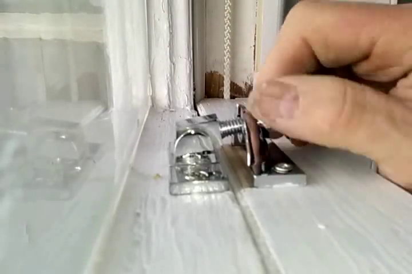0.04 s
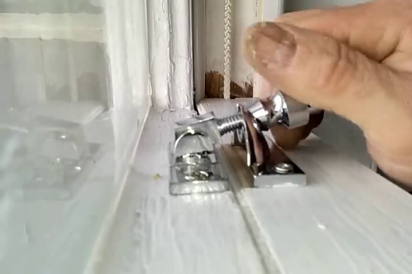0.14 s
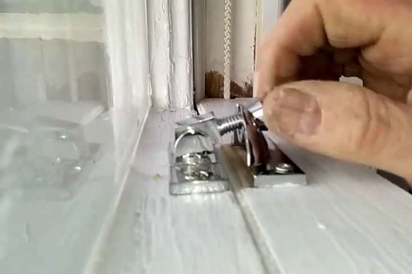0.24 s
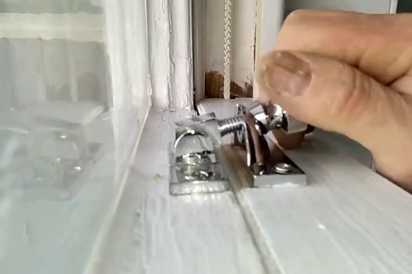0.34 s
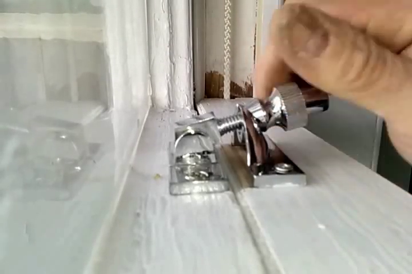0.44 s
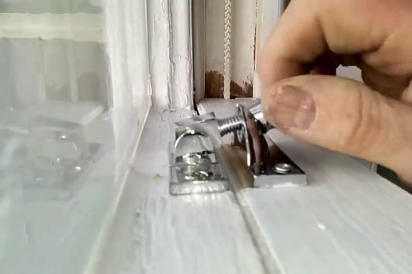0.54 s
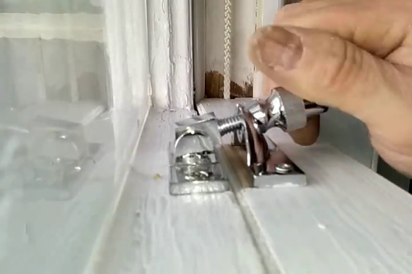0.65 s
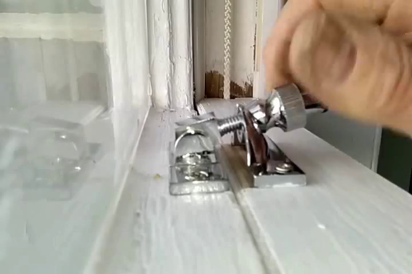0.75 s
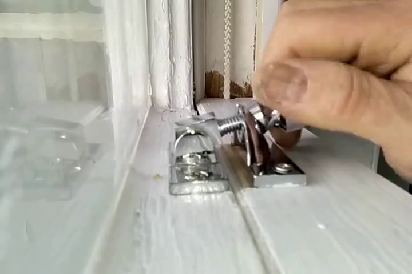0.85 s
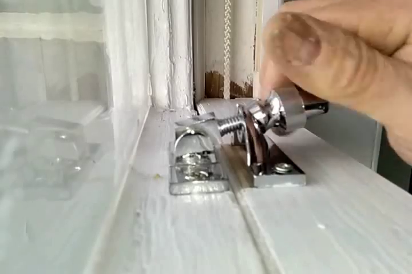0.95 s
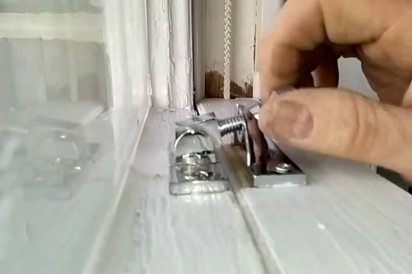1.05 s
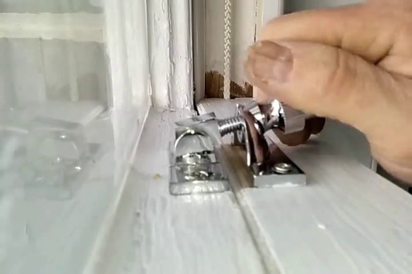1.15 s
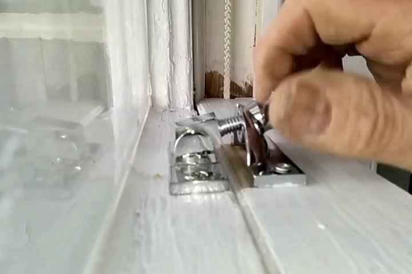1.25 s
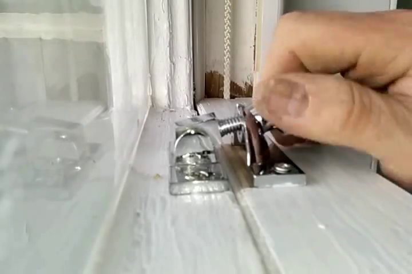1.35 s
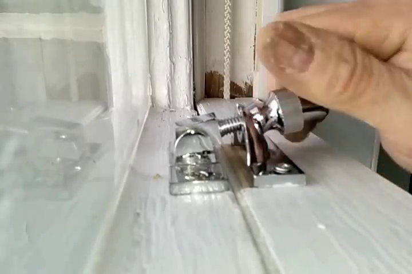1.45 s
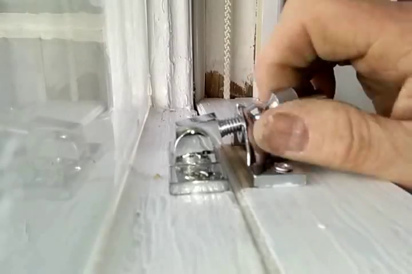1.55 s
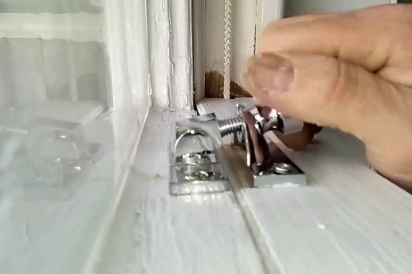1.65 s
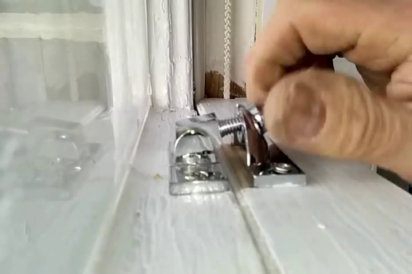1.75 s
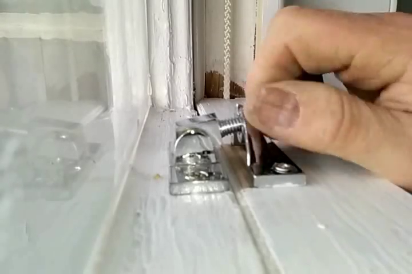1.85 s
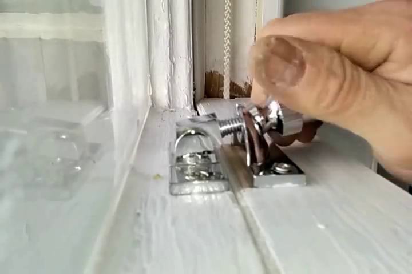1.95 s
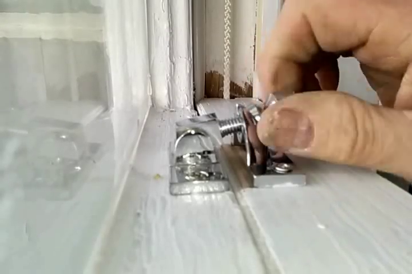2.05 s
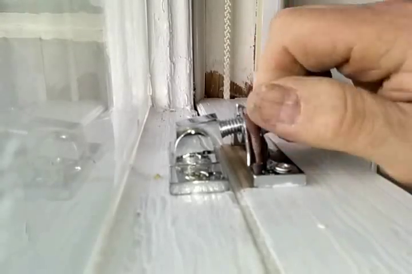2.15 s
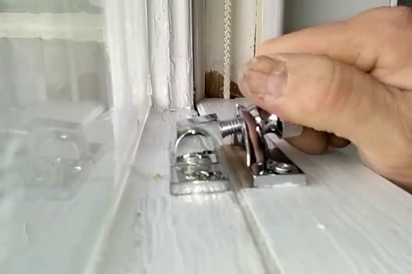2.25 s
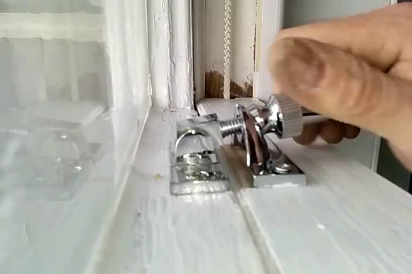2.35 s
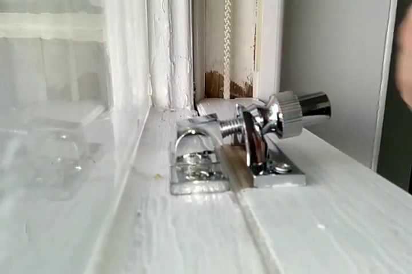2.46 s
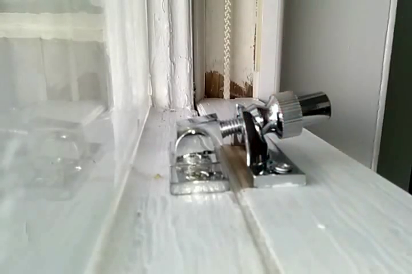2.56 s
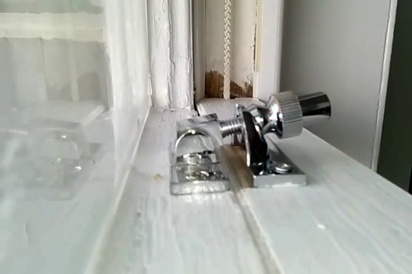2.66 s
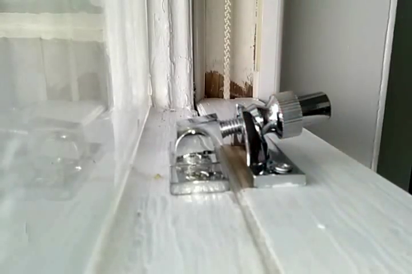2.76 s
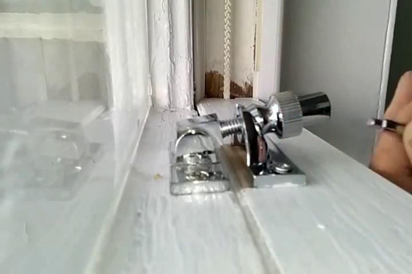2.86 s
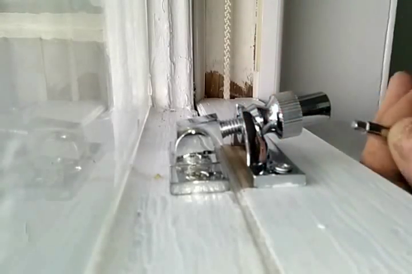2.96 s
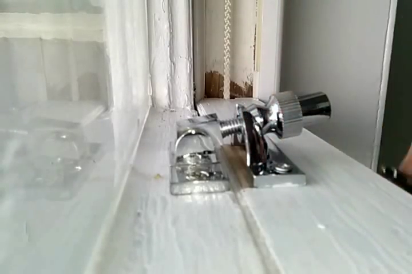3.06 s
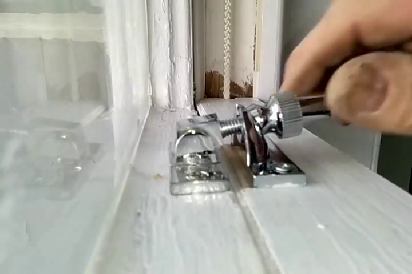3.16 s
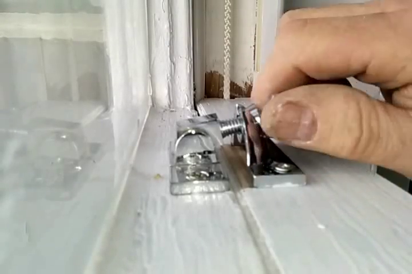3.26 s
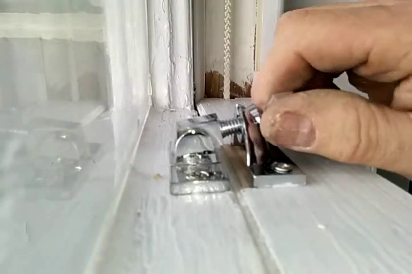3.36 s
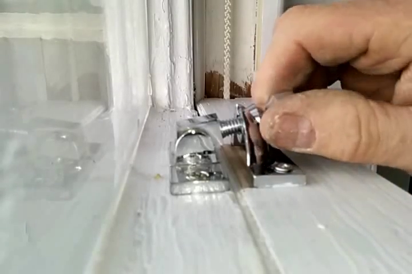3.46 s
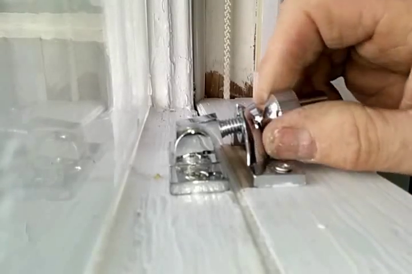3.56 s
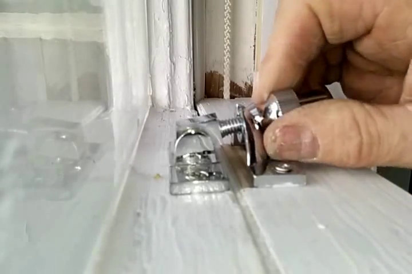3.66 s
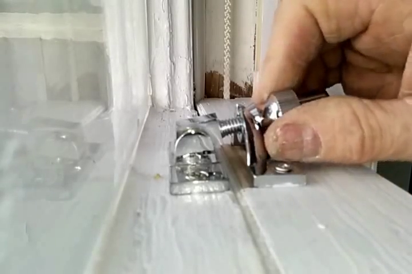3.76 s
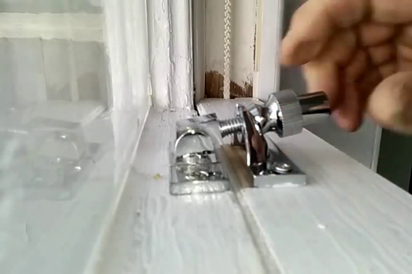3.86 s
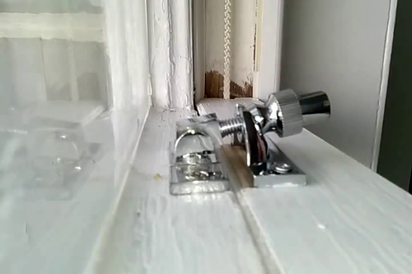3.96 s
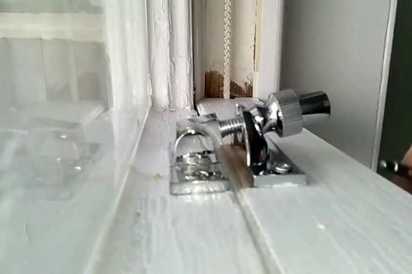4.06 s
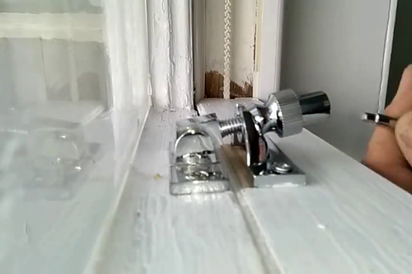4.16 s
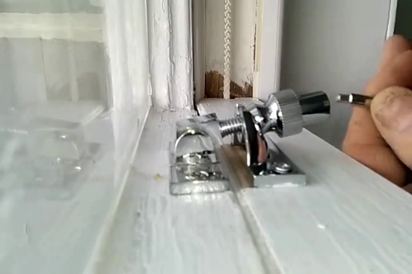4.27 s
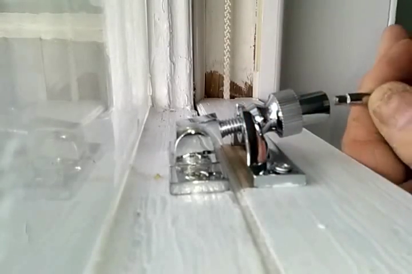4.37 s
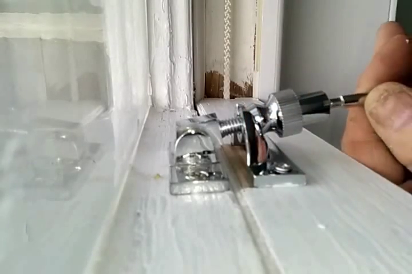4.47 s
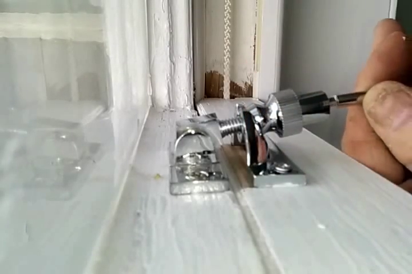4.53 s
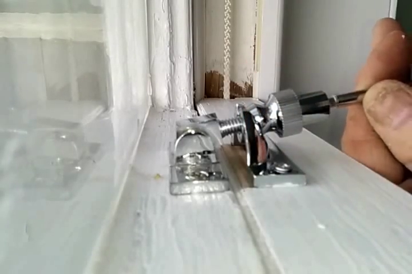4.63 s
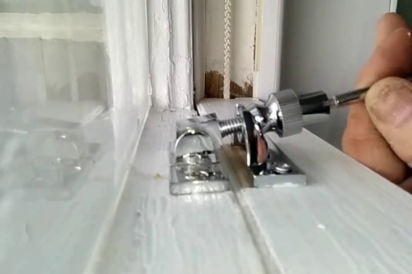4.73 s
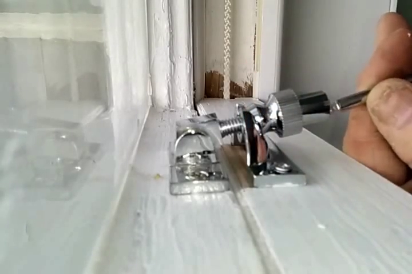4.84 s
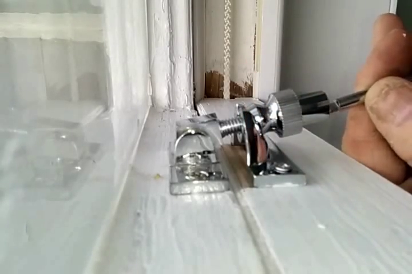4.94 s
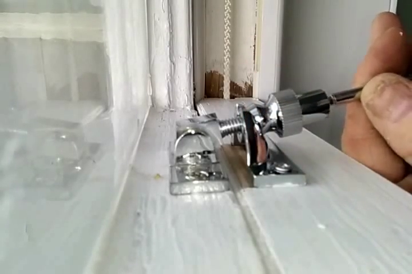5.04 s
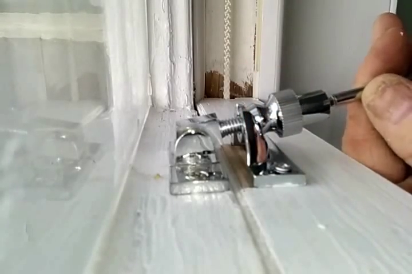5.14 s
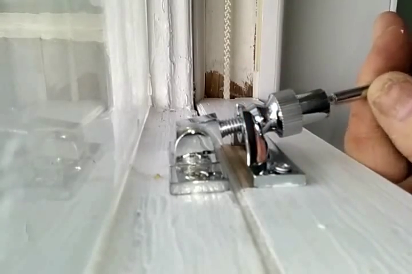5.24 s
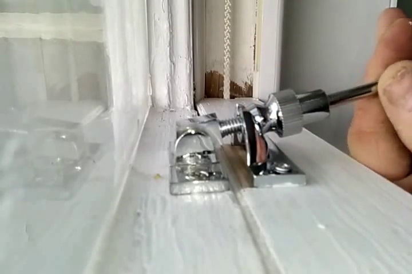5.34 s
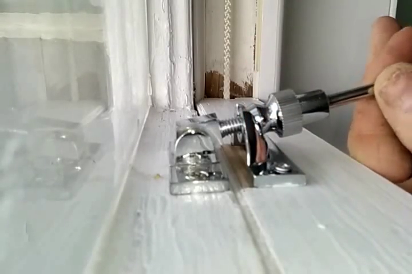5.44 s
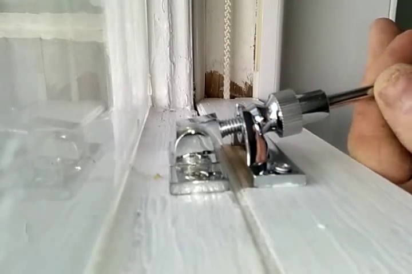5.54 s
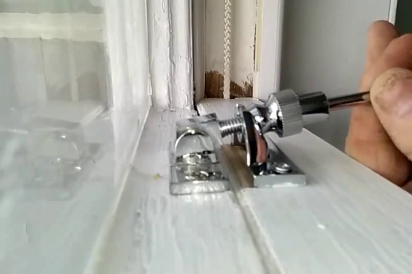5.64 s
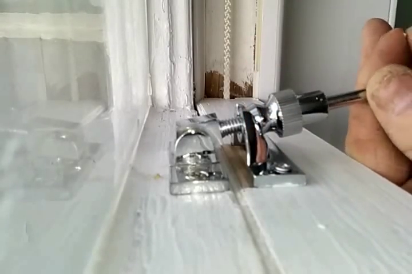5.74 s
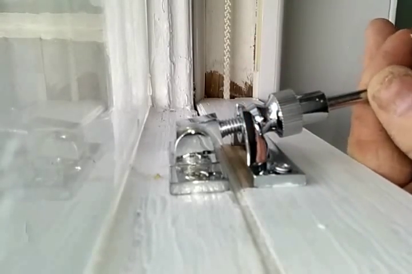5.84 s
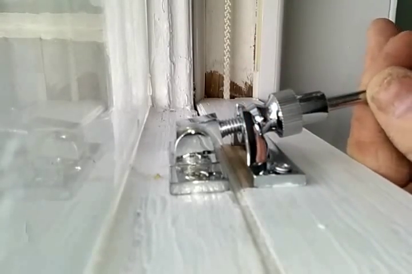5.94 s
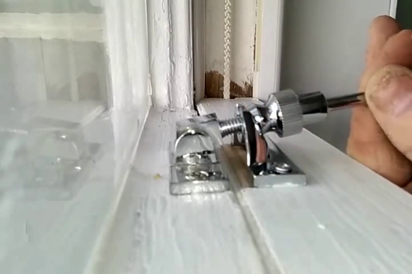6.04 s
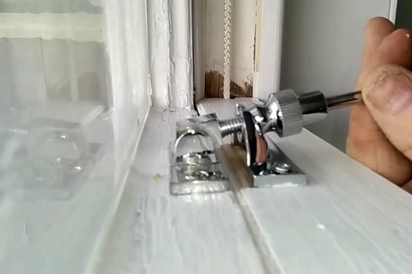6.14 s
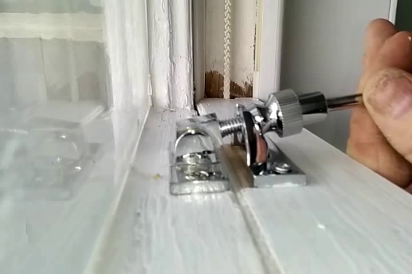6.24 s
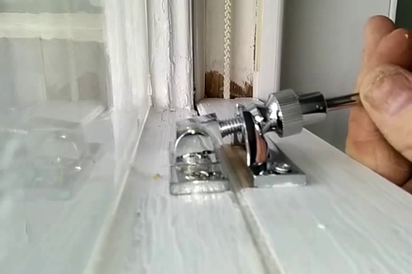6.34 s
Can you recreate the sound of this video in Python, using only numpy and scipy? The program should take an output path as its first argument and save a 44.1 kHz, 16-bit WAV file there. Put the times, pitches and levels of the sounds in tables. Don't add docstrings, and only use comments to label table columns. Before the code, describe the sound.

Very close to a wooden window sash, fingers spin the nut of a loose metal fastener: irregular sharp clacks, chattering rattles and brief thread rubs, with low hand rumble through the wood. It quiets after about two seconds, leaving faint touches. A small cluster of clicks follows, then a little key ticks and turns in the barrel. Quiet room, short reflections, faint hiss.

```python
import sys
import numpy as np
from scipy import signal
from scipy.io import wavfile
from scipy.ndimage import uniform_filter1d

SR = 44100
rng = np.random.default_rng(int(sys.argv[2]) if len(sys.argv) > 2 else 0)


def wav_out(sig):
    wavfile.write(sys.argv[1], SR, np.round(np.clip(np.atleast_2d(sig).T, -1, 1) * 32767).astype(np.int16))


def to_linear_factor(level_db):
    exponent = np.asarray(level_db, float) / 20
    return 10 ** exponent


N = 282240

WOOD_EDGE_HZ = 4500


def evened(x):
    return x / np.sqrt(np.mean(x ** 2) + 1e-20)


def add(mix, s, sound):
    part = mix[round(s * SR):][:len(sound)]
    part += sound[:len(part)]


def band(x, lo_hz, hi_hz, order=3):
    return signal.sosfilt(signal.butter(order, [lo_hz, hi_hz], "bandpass", fs=SR, output="sos"), x)


def slips(shape, per_s, size_db=6.5):
    when, size, sign = rng.random((3, len(shape)))
    heights = to_linear_factor(-size_db * np.log(size + 0.0046)) * np.sign(sign - .5)
    return shape * (when < per_s / SR) * heights


def fizz(envelope):
    noise = band(rng.standard_normal(len(envelope)), 4700, 15000, order=2)
    lower = band(band(noise, 3000, 7000, order=1), 3000, 8500, order=1)
    return evened(.15 * noise + lower) * envelope


# t/s, sash f/Hz, plate f/Hz, nut f/Hz
SPOTS = [(0.063, 300.0, 1290.0, 3050.0), (0.237, 400.0, 1590.0, 4110.0), (0.277, 600.0, 1660.0, 2990.0),
         (0.417, 450.0, 1170.0, 3880.0), (0.463, 940.0, 1060.0, 3830.0), (0.546, 830.0, 1060.0, 2920.0),
         (0.681, 460.0, 1320.0, 3000.0), (0.709, 470.0, 1060.0, 3140.0), (0.773, 380.0, 1690.0, 3010.0),
         (0.938, 580.0, 2290.0, 2700.0), (0.991, 460.0, 1660.0, 3000.0), (1.005, 460.0, 1730.0, 2770.0),
         (1.187, 710.0, 1670.0, 3420.0), (1.235, 710.0, 1740.0, 3010.0), (1.25, 390.0, 1690.0, 2980.0),
         (1.446, 690.0, 1060.0, 3040.0), (1.466, 720.0, 1180.0, 2990.0), (1.502, 720.0, 1990.0, 2740.0),
         (1.53, 380.0, 2100.0, 3490.0), (1.706, 370.0, 2550.0, 3030.0), (1.769, 900.0, 1680.0, 3200.0),
         (2.011, 870.0, 1230.0, 3150.0), (2.064, 540.0, 1340.0, 3040.0), (2.202, 600.0, 2550.0, 2820.0),
         (2.34, 330.0, 1270.0, 3940.0), (2.462, 300.0, 1290.0, 3610.0), (2.724, 550.0, 2550.0, 3690.0),
         (2.941, 310.0, 1720.0, 2750.0), (3.152, 300.0, 2140.0, 2860.0), (3.363, 990.0, 1310.0, 2960.0),
         (3.669, 820.0, 1230.0, 3180.0), (3.963, 710.0, 1420.0, 4080.0), (4.679, 950.0, 1890.0, 3940.0),
         (4.891, 900.0, 1230.0, 3990.0), (4.911, 910.0, 1970.0, 3030.0), (5.144, 460.0, 1340.0, 3840.0),
         (5.241, 710.0, 1220.0, 3890.0), (5.332, 700.0, 2170.0, 4480.0), (5.398, 910.0, 1340.0, 3010.0),
         (5.445, 800.0, 1310.0, 3240.0), (5.747, 900.0, 1700.0, 2890.0), (5.897, 790.0, 1870.0, 2700.0),
         (6.097, 710.0, 1060.0, 4430.0), (6.157, 730.0, 2160.0, 3070.0)]


def spot(s):
    return [row for row in SPOTS if row[0] <= max(s, SPOTS[0][0])][-1][1:]


def favour(modes, near_hz, db_per_octave):
    return [(hz, db - db_per_octave * abs(np.log2(hz / near_hz))) for hz, db in modes]


def ring(modes, t60):
    t = np.arange(SR // 6) / SR
    hz, db = np.repeat(modes, repeats=9, axis=0).T
    detune, strength, life, phase = rng.standard_normal((4, len(hz), 1))
    hz = hz[:, None] * (1 + 0.045 * detune)
    db = db[:, None] - 8 * (hz > WOOD_EDGE_HZ) + 2.5 * strength
    decay = to_linear_factor(-60 * t / (t60 * np.exp(0.29 * life)))
    lines = np.sin(2 * np.pi * (hz * t + np.pi + 0.6 * phase)) * decay
    return (to_linear_factor(db) * lines).sum(0) * (1 - np.exp(-t / .0003))


# f/Hz, level/dB
SASH = [(258, 1), (338, 2.5), (398, 1), (463, 6), (560, 3.5), (620, -0.5), (708, 3.5), (840, 4), (912, 3.5),
        (972, -10)]
# f/Hz, level/dB
PLATE = [(1055, -2), (1270, 2), (1330, -8.5), (1500, -2), (1685, 1.5), (1820, -8.5), (1970, -2), (2110, 2),
         (2290, -18.5), (2520, -5.5)]
# f/Hz, level/dB
NUT = [(2560, -13), (2770, -8), (2990, -8), (3220, -10), (3480, -10.5), (3680, -13), (3860, -9.5),
       (4080, -11), (4320, -13), (4560, -19)]
RING_S = (0.11, 0.021, 0.0092)
SETTLE_MS = (8.64, 11.85, 8.9)
FAVOUR_DB_PER_OCTAVE = (6, 11, 12)
# f/Hz, level/dB under the nut
HUM_ON = [(2780, -40.5), (3210, -51.5), (3850, -44.5)]


def hit(near_hz, loose, plate_db, sash_db, nut_db, nut_hz, cut_ms, graze_size):
    ms = np.arange(SR // 6) * 1000 / SR
    since = ms - 9
    after = np.maximum(since, 0) / 1000
    damping = np.exp(-(np.maximum(since, 0) / cut_ms) ** 3)

    burst = np.exp(-abs(since) / np.where(since > 0, 6., 2.)) + .07 * (since > 0)
    out = .4 * to_linear_factor(max(plate_db, nut_db) - 28) * fizz(damping * burst)
    out -= to_linear_factor(plate_db - 10) * np.exp(-((since - .3) / .13) ** 2)

    hum_on_s = 0.26
    fade = loose * np.cos(np.pi / 2 * ms / ms[-1]) * to_linear_factor(nut_db - 60 * after / hum_on_s)
    out += fade * sum(to_linear_factor(db) * np.sin(2 * np.pi * hz * after) for hz, db in HUM_ON)

    parts = map(favour, (SASH, PLATE, NUT), (*near_hz[:2], nut_hz), FAVOUR_DB_PER_OCTAVE)
    levels_db = (sash_db, plate_db, nut_db)
    for modes, t60, db, settle_ms in zip(parts, RING_S, levels_db, SETTLE_MS):
        graze = graze_size * np.exp(np.minimum(since, 0) / 4.)
        rebounds = np.where(since < 0, graze, np.exp(-since / settle_ms))
        chatter = .15 * slips(rebounds, 4500., size_db=4.3)
        chatter[np.argmax(since >= 0)] = 1
        rung = signal.fftconvolve(ring(modes, t60), chatter)[:len(ms)]
        part = band(rung, 60, 4900, order=5) * damping
        out = out + to_linear_factor(db - 8.0) * part / abs(part).max()
    return out


def strike(metal, s, *levels_pitch_damping):
    key = s > 3.5
    graze_size = .6 if key else .25
    add(metal, s - .0086, hit(spot(s), s < 3.5, *levels_pitch_damping, graze_size))


# t/s, plate level/dB, sash level/dB, nut level/dB
SPIN = [(0.0662, -31, -26.5, -33.5), (0.082, -55, -28.5, -30), (0.2797, -14, -18.5, -20.5),
        (0.286, -21, -26, -17.5), (0.2919, -22, -38, -26.5), (0.4215, -33.5, -25, -33),
        (0.5495, -19, -18.5, -13.5), (0.6841, -24, -21.5, -22.5), (0.7127, -28, -58.5, -21.5),
        (0.776, -20, -21, -14.5), (0.9411, -38, -27, -44), (0.9937, -25, -19.5, -26),
        (1.0086, -14.5, -17, -28), (1.1899, -32.5, -25, -52), (1.221, -50, -50, -67.5),
        (1.2382, -25.5, -24, -35), (1.2536, -18.5, -15.5, -15), (1.4488, -44, -33, -62.5),
        (1.4692, -26, -20.5, -34.5), (1.505, -24, -50.5, -31), (1.5334, -14, -22.5, -11),
        (1.709, -31.5, -42, -29.5), (1.772, -25.5, -36, -27), (2.0142, -29, -33, -38),
        (2.0667, -27, -19, -33), (2.0839, -38, -30, -31), (2.2053, -50, -40, -32), (2.465, -42, -43.5, -68)]


def spinning_nut(metal):
    for s, *levels_db in SPIN:
        strike(metal, s, *levels_db, spot(s)[2], 130)


# t/s, plate level/dB, sash level/dB, nut level/dB, nut f/Hz
BARREL = [(0.2414, -26, -25.5, -13.5, 4600), (2.343, -40.5, -42, -29, 3900), (3.808, -86, -63.5, -61, 3800),
          (3.6725, -28.5, -28.5, -24, 3220), (3.679, -24.5, -27.5, -22, 3530),
          (3.9657, -32, -24, -42, 3010), (3.9717, -39, -43, -19.5, 4050), (3.979, -36, -42, -40, 3870),
          (4.6831, -22, -22, -24.5, 3240), (4.687, -26.5, -31.5, -19, 4370),
          (4.8943, -20.5, -15.5, -70, 2650), (4.899, -25, -34, -27.5, 4100),
          (4.9141, -17.5, -27, -24.5, 2940), (5.1472, -21.5, -22, -30, 4400), (5.243, -85, -47, -34, 3900),
          (5.335, -51, -43.5, -27.5, 3100), (5.3401, -50, -50, -19, 4240), (5.4015, -25, -25, -29.5, 4600),
          (5.407, -23.5, -46, -22.5, 3100), (5.416, -38, -27.5, -12.5, 3600), (5.448, -14, -21, -38, 4330),
          (5.4518, -22, -29.5, -22, 3970), (6.1, -37, -29.5, -61, 4570), (6.104, -32.5, -39, -49, 3000),
          (6.113, -30.5, -31.5, -27.5, 3830), (6.1603, -37, -38.5, -34, 3540)]
KEY_CUT_MS = 63


def barrel(metal):
    for row in BARREL:
        strike(metal, *row, KEY_CUT_MS)


# t/s, plate level/dB, sash level/dB
TOUCHES = [(0.4663, -31, -64), (.677, -33, -34), (.987, -29, -35), (1.9718, -52, -78), (2.3171, -51, -70),
           (2.7274, -47.5, -51), (2.944, -51.5, -44.5), (3.1554, -50.5, -85), (3.3663, -49.5, -61),
           (3.6338, -55, -50), (4.5684, -76, -60), (5.7503, -42, -57), (5.9014, -47, -45.5),
           (6.0741, -53.5, -50)]


def touches(metal):
    for s, plate_db, sash_db in TOUCHES:
        strike(metal, s, plate_db, sash_db, plate_db - 17, spot(s)[2], KEY_CUT_MS)


# t/s, level/dB
JOLTS = [(0.2812, -16.8), (0.55, -20.5), (0.6846, -23.6), (0.777, -22.3), (0.9946, -24.0), (1.0096, -18.5),
         (1.1924, -28.1), (1.2525, -19.8), (1.4703, -23.9), (1.5344, -15.7), (3.6728, -28.7),
         (4.6833, -24.5), (4.9148, -21.4), (5.1491, -30.7)]


def jolts(metal):
    ms = np.arange(SR // 100) * 1000 / SR
    push = band(np.exp(-((ms - 1) / .105) ** 2), 250, 9000, order=1)
    edge = signal.cheby1(6, 1, WOOD_EDGE_HZ, fs=SR, output="sos")
    x = signal.sosfilt(edge, push)
    for s, db in JOLTS:
        add(metal, s - .0012, -to_linear_factor(db) * x / abs(x).max())


# t/s, length/s, plate level/dB, sash level/dB, nut level/dB
RUBS = [(.005, 0.075, -70.5, -58, -73), (0.061, 0.093, -62, -49.5, -52), (0.143, 0.12, -80, -63, -72.5),
        (0.205, .052, -59, -52.5, -52), (0.294, 0.069, -60, -49, -59), (0.357, 0.083, -78, -61, -82),
        (.415, 0.12, -66, -50, -60.5), (0.562, 0.081, -69, -56, -80), (0.694, 0.07, -58, -44, -50),
        (0.805, 0.056, -72, -50.5, -74), (0.863, 0.086, -73, -63, -81), (1.01, 0.078, -65, -46, -65.5),
        (1.186, 0.077, -55, -47.5, -53), (1.266, 0.054, -69, -51, -61), (1.464, .074, -50, -45, -44),
        (1.545, 0.063, -60, -46.5, -61), (1.714, 0.1, -58, -58.5, -56), (1.996, 0.068, -77, -66, -58),
        (2.086, 0.038, -72, -59, -63), (2.303, 0.066, -73, -67.5, -71), (2.468, .039, -73, -71, -76.5),
        (2.712, 0.087, -76, -69, -70), (3.15, 0.018, -80.5, -83, -82.5), (3.349, 0.036, -85, -72, -83),
        (2.825, 0.11, -81.5, -71, -85), (3.633, 0.082, -76, -71, -66.5), (5.368, 0.097, -68, -58, -63.5),
        (6.178, 0.056, -79, -68.5, -76.5), (4.918, 0.069, -56.5, -42.5, -63.5),
        (5.148, 0.042, -61, -49.5, -49), (5.233, 0.0245, -64, -67, -53.5), (5.416, 0.057, -60, -42, -51.5),
        (5.458, 0.087, -58.5, -48.5, -66), (5.719, 0.092, -70, -60.5, -68.5),
        (5.792, 0.089, -74, -65, -74.5), (6.087, 0.054, -62, -64, -60), (6.205, 0.14, -82.5, -77, -85.5),
        (6.355, 0.054, -87, -68, -85)]


def rub(length, plate_db, sash_db, nut_db, near_hz):
    size = int(length * SR)
    swell = uniform_filter1d(rng.standard_normal((SR // 4, 3)), size=400, axis=0)
    grip = to_linear_factor(2.3 * evened(swell))
    stroke = signal.windows.tukey(size, .6) * to_linear_factor(np.linspace(0, -7., size))
    stroke = np.pad(stroke, (0, len(grip) - size))
    drives = [slips(stroke * g, 3000., size_db=2.0) for g in grip.T]
    favoured = map(favour, (SASH, PLATE, NUT), near_hz, (5., 5., 9.))
    bodies = map(ring, favoured, (0.035, 0.02, 0.007))
    parts = []
    for drive, body in zip(drives, bodies):
        part = band(signal.fftconvolve(drive, body)[:len(grip)], 60, 4900, order=5)
        parts.append(part / np.sqrt(np.mean(part[:size] ** 2) + 1e-20))
    sash, plate, nut = parts
    nut = nut + to_linear_factor(-21) * fizz(uniform_filter1d(stroke, size=900) * grip[:, 2])
    return to_linear_factor(plate_db) * plate + to_linear_factor(sash_db) * sash + to_linear_factor(nut_db) * nut


def rubbing_thread(metal):
    for s, *row in RUBS:
        add(metal, s, rub(*row, spot(s + .02)))


# t/s, level/dB, t60/ms
CHINKS = [(.237, -40, 30), (.4665, -48, 45), (.945, -66, 40), (1.215, -54, 60), (1.71, -60, 30),
          (3.03, -70, 30), (3.052, -70, 30), (4.69, -56, 50), (5.402, -48, 25), (5.447, -50, 25),
          (5.728, -65, 60), (5.888, -65, 35)]
WASHER_HZ = (5150, 5330, 5420, 5600)


def washer(metal):
    t = np.arange(SR // 16) / SR
    for s, db, t60_ms in CHINKS:
        lines = sum(np.sin(2 * np.pi * (hz * t + rng.random())) for hz in WASHER_HZ)
        add(metal, s, to_linear_factor(db - 60000 * t / t60_ms) * lines * (1 - np.exp(-t / .003)) / 2)


# t/s, level/dB, t60/ms
TICKS = [(0.0829, -45.5, 4.1), (0.2376, -30.5, 4.4), (0.278, -48, 7.3), (0.5443, -77, 6.2),
         (0.6821, -71, 15), (0.711, -38, 36), (0.778, -52, 4.1), (1.0086, -89, 12), (1.197, -55, 8.1),
         (1.2557, -75.5, 11), (1.482, -46, 7.3), (1.527, -32, 3.7), (1.7744, -85, 16), (2.0437, -52, 29),
         (2.152, -45.5, 5.2), (2.2023, -62.5, 17), (2.346, -39, 7), (3.6736, -57, 12.6), (3.9693, -46, 7.1),
         (4.6818, -40, 17), (6.038, -41, 1.8), (6.095, -52, 24), (6.116, -49, 15)]
# t/s, level/dB, t60/ms
LATE_TICKS = [
    (5.099, -54, 5),
    (5.336, -52, 6),
    (5.4031, -50, 6),
]


def ticks(near):
    ms = np.arange(SR // 12) * 1000 / SR
    for s, db, t60_ms in [*TICKS, *LATE_TICKS]:
        noise = band(rng.standard_normal(len(ms)), 6200, 14500, order=5)
        crack = band(noise, 5000, 8000, order=1)
        crack *= to_linear_factor(-60 * ms / min(t60_ms, 22)) * (1 - np.exp(-ms / .6))
        add(near, s, to_linear_factor(db) * crack / abs(crack).max())


# t/s, level/dB, f/Hz
BUMPS = [(0.431, -22, 151), (1.249, -27, 150), (1.468, -41, 140), (1.541, -30.5, 156), (1.702, -69, 66.2),
         (1.823, -38.5, 137), (2.031, -39, 154), (2.126, -28, 114), (2.251, -38.5, 137), (2.34, -39, 76.4),
         (2.469, -42.5, 246), (3.629, -48, 111), (3.698, -44, 204), (3.682, -36, 64.6), (3.685, -29.5, 169),
         (3.974, -57, 228), (4.675, -68, 101), (4.911, -66, 183), (5.157, -40, 207), (5.436, -67, 233),
         (5.437, -36, 93), (5.838, -53.5, 214), (6.106, -44.5, 240)]


def bumps(near):
    t = np.arange(SR // 12) / SR
    for s, db, hz in BUMPS:
        x = np.sin(2 * np.pi * hz * t) * t * np.exp(-t / 0.011)
        add(near, s - .01, to_linear_factor(db - 10.5) * x / abs(x).max())


# t/s, level/dB, f/Hz
KNOCKS = [
    (2.809, -44, 115),
    (2.832, -53, 300),
    (2.905, -56, 700),
    (2.959, -51, 380),
    (3.058, -57, 110),
    (3.498, -46, 95),
    (4.347, -57, 220),
    (4.571, -51, 140),
    (5.248, -52, 130),
]


def knocks(near):
    for s, db, hz in KNOCKS:
        turns = (np.arange(SR // 25) / SR - .02) * hz
        add(near, s - .0195, -to_linear_factor(db) * np.sin(2 * np.pi * turns) * np.exp(-(turns / .5) ** 2))


# t/s, level/dB
GRIP = [(0, -63), (.12, -39.5), (.23, -35.5), (.68, -31.5), (.86, -43.5), (1.2, -47.5), (1.4, -68),
        (2.0, -92), (2.25, -46), (2.45, -93.5), (3.05, -65.5), (3.8, -76), (4.37, -64.5), (5.0, -79),
        (5.55, -61), (6.4, -67)]
# t/s, deep rumble level/dB, creak level/dB
SHOVES = [(0., -26, -59), (0.067, -27, -56), (0.798, -29, -43.5), (1.026, -29.5, -43), (1.119, -31, -48.5),
          (1.26, -41, -45), (1.327, -47, -45.5), (1.479, -42, -60), (1.599, -48, -54.5), (1.711, -50, -63),
          (1.838, -49, -69), (2.033, -42, -49), (2.079, -72, -46.5), (2.141, -67, -77), (2.348, -42.5, -53),
          (2.479, -53, -64), (2.849, -59, -61.5), (2.952, -62, -70.5), (3.061, -59, -71),
          (3.62, -44.5, -62.5), (3.708, -38.5, -44), (3.988, -51, -69), (4.581, -71, -65), (4.71, -50, -80),
          (4.97, -55, -76), (5.171, -40.5, -72), (5.448, -70.5, -52), (6.111, -52, -61.5)]
# f/Hz, half width/Hz, level/dB
THUD = [(58, 9, 1), (98, 9, -3), (158, 22, -1), (258, 60, -4)]


def pressure():
    t = np.arange(0, N / SR + .01, .002)
    s, deep_peaks, creak_peaks = np.transpose(SHOVES)[:, :, None]
    away_db = np.where(t < s, 450.5 * (s - t), 308.5 * (t - s))
    grip_db = np.interp(t, *np.transpose(GRIP))
    deep_db = np.maximum((deep_peaks - away_db).max(0), grip_db)
    creak_db = np.maximum((creak_peaks - away_db).max(0), grip_db - 14.5)
    deep_db, creak_db = (np.interp(np.arange(N) / SR, t, db) for db in (deep_db, creak_db))

    unevenness, *shakes = rng.standard_normal((5, N))
    lumps = to_linear_factor(0.39 * evened(uniform_filter1d(uniform_filter1d(unevenness, size=500), size=500)))
    modes = [to_linear_factor(db) * evened(band(x, hz - w, hz + w, order=2)) for x, (hz, w, db) in zip(shakes, THUD)]
    deep = (modes[0] + modes[1]) * to_linear_factor(deep_db - 10.5)
    creak = (modes[2] + modes[3]) * lumps * to_linear_factor(creak_db)
    return deep + creak


def recess(x):
    t = np.arange(SR // 4) / SR
    tail = slips(to_linear_factor(-60 * t / .05) * (t > .004), 9000.0, size_db=1.9)
    return signal.fftconvolve(x, tail / np.linalg.norm(tail))[:N]


# f/Hz, level/dB per Hz
FLOOR = [(26, -51.5), (45, -3.5), (102, -13), (190, -20), (310, -13.5), (556, -17.5), (700, -18),
         (978, -18.5), (1200, -20.5), (1500, -26)]
# f/Hz, level/dB per Hz
FLOOR_TOP = [(2100, -30), (3200, -34), (4600, -44), (6000, -70)]
# f/Hz, width/Hz, level/dB
FLOOR_BANDS = [(930, 24, 6), (670, 160, 0.5), (320, 80, 0.5)]


def room_floor():
    frames, hz = N // 128 + 5, np.fft.rfftfreq(512, 1 / SR)
    a, b, patches = rng.standard_normal((frames, 257, 3)).T
    patches = uniform_filter1d(uniform_filter1d(patches, size=3, axis=0), size=24, axis=1)
    swell = uniform_filter1d(uniform_filter1d(a[0], size=70), size=70)
    f, db = np.transpose([*FLOOR, *FLOOR_TOP])
    shape_db = np.interp(np.log(hz + 1), np.log(f), db)
    for at, width, up_db in FLOOR_BANDS:
        shape_db = shape_db + up_db * np.exp(-((hz - at) / width) ** 2)
    z = (a + 1j * b) * to_linear_factor(shape_db[:, None] + 3.0 * evened(patches) + 1.8 * evened(swell))
    return to_linear_factor(-69) * evened(signal.istft(z, nperseg=512, noverlap=384)[1][:N])


def scene():
    metal = np.zeros(N)
    for source in (spinning_nut, barrel, touches, jolts, rubbing_thread, washer):
        source(metal)
    near = pressure() + room_floor()
    for source in (ticks, bumps, knocks):
        source(near)
    return (metal + to_linear_factor(-10.0) * recess(metal) + near)[None]


def band_limit(x):
    return signal.sosfilt(signal.butter(12, 15850, fs=SR, output="sos"), x)


def record(dry):
    hiss = to_linear_factor(-83) * evened(band(rng.standard_normal(dry.shape), 2600, 17000, order=1))
    bass_cut = signal.butter(4, 42, "highpass", fs=SR, output="sos")
    mix = signal.sosfilt(bass_cut, dry + hiss)
    return band_limit(mix)


dry = scene()
out = record(dry)
wav_out(out)
```